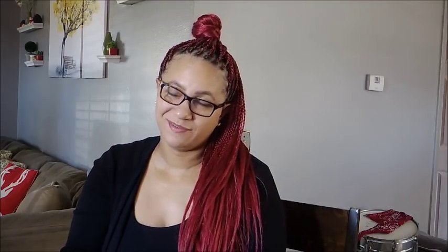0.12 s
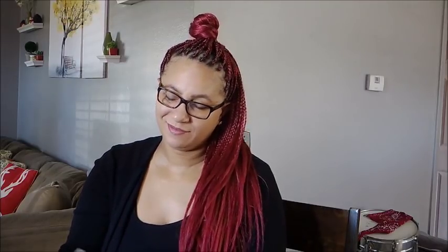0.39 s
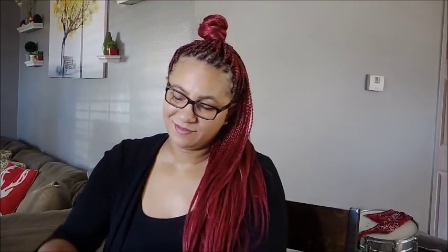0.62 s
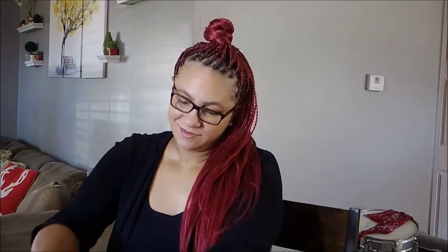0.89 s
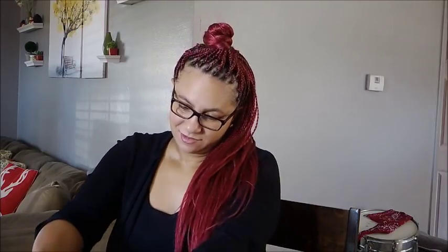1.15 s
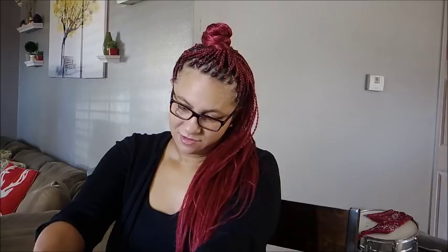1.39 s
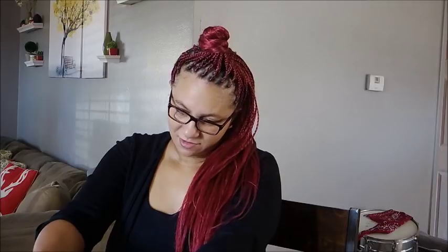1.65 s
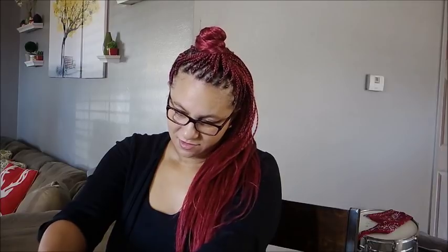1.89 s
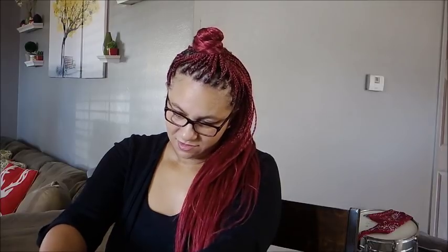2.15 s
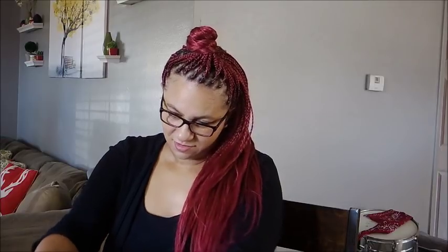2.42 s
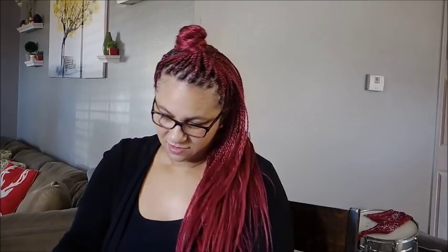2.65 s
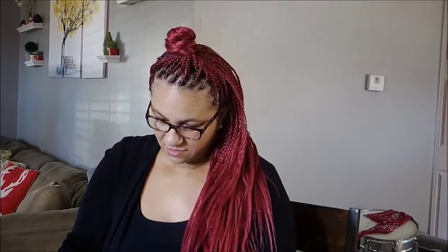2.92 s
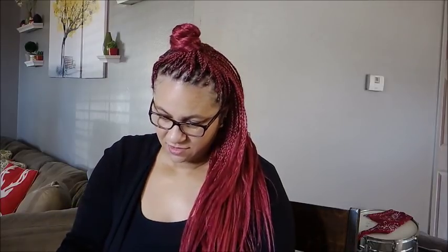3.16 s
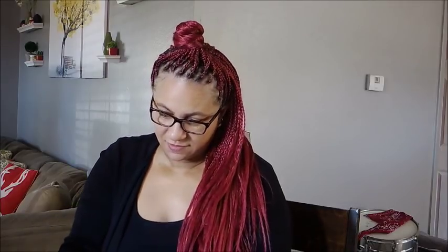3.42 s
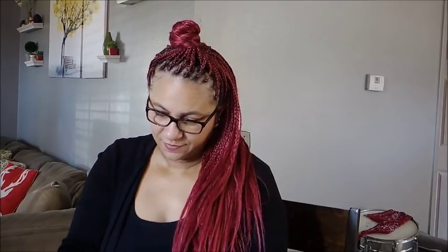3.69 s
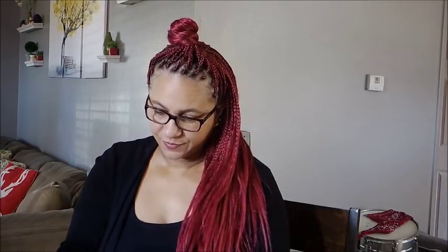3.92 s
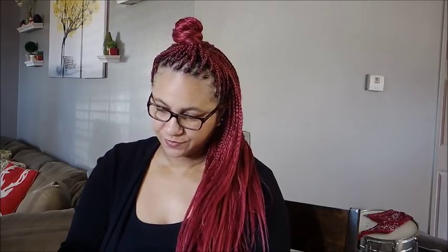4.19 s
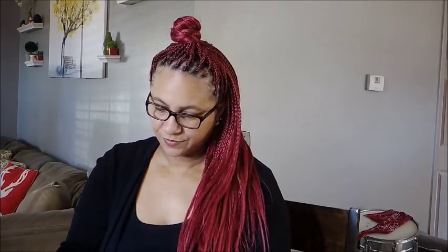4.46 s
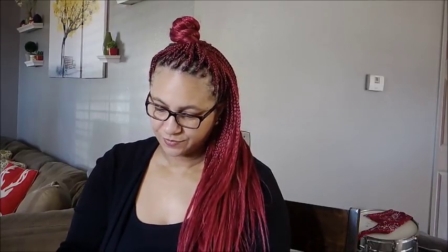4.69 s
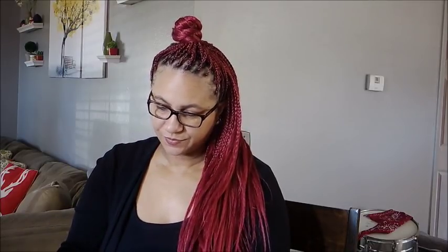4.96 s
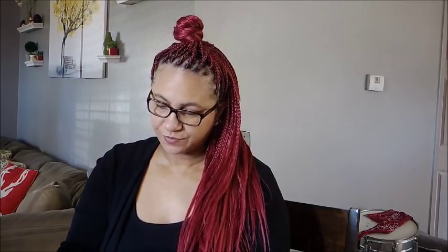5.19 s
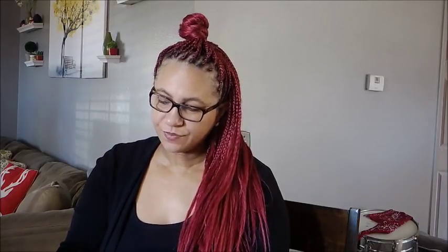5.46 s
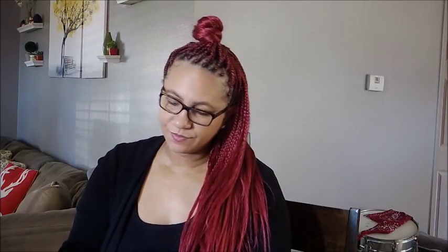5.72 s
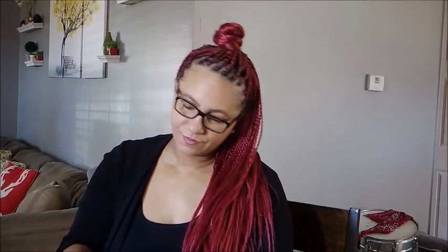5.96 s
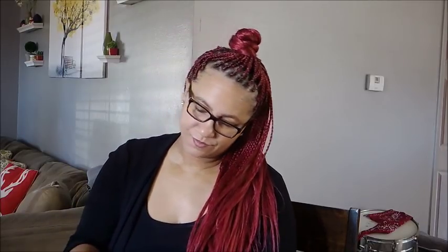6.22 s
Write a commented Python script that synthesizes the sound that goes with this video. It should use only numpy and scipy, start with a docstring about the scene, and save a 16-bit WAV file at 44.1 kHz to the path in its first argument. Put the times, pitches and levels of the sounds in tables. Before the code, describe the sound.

A close mono microphone hears cards handled on a wooden table: a slap and flat double knock, a quiet gap, then a papery riffle thickening into crisp ticks and a tight clap. Packets are shoved together with lumpy slaps and rubbing. Later come a quick edge tap, a much harder cracking blow and low closing knocks, with short room reverberation over soft hum and hiss.

```python
"""A deck of cards is handled on a wooden table in a living room, with a soft hum underneath throughout.
It starts with a snap, a slap and flat knocks: noise bursts, plus decaying tones for wood and room boom.
From about 1 s the cards riffle: edges click over a rub made of tiny catches; one noisy clap follows.
From about 2.7 s the cards are pushed together, with slaps of lumpy noise. Edge knocks come near 4.4 s.
The hardest blow, at 5.6 s, makes the deck ring; flat knocks end it. Fading noise makes the walls answer."""
import sys
import numpy as np
from scipy import signal
from scipy.fft import rfft, irfft
from scipy.io import wavfile
from scipy.ndimage import map_coordinates

SR = 44100
rng = np.random.default_rng(int(sys.argv[2]) if len(sys.argv) > 2 else 0)


def bounce(signal):
    """Save signal as a 16-bit WAV file at the path given by the first command-line argument."""
    frames = np.transpose(np.atleast_2d(signal))
    limited = np.clip(frames, -1, 1)
    pcm = np.round(limited * 32767).astype(np.int16)
    wavfile.write(sys.argv[1], SR, pcm)


def volts_from_db(level):
    """Convert decibel levels to linear amplitude ratios."""
    exponent = np.asarray(level, float) / 20
    return 10 ** exponent


N = 279726  # length in samples

# Levels called relative set a balance; the functions below scale them further.
# Colour of the room's rumble and the microphone hiss: pitch_hz, relative level_db per hertz
AIR_COLOUR = [(12, -46), (20, -1), (66, 0), (113, -5), (152, -6.5), (174, -6.5), (222, -9), (275, -8.5),
              (729, -19), (1120, -23), (1220, -25), (1780, -26.5), (6010, -38.5), (6880, -34),
              (11100, -52.5), (11600, -55), (12800, -65.5), (16700, -100), (22000, -120)]
# Card edges letting go: start_s, relative tick level_db, flap over the tick_db
EDGE_SNAPS = [(.0005, -28.5, 7.5), (.008, -43, 15), (0.1177, -51, 21.5), (1.0682, -43, -1),
              (1.0998, -27, -6), (1.1844, -30, -6), (1.1898, -17.5, -12.5), (1.196, -29, 0),
              (1.256, -41, -2), (1.289, -26.5, -7.5), (1.3075, -31, -10), (1.323, -30.5, -1),
              (1.3458, -12.5, -10.5), (1.3561, -23, 2), (1.4073, -20.5, 3), (1.451, -18, -9),
              (1.4815, -21, -1), (1.4952, -10, -6.5), (1.565, -17, -5.5), (1.5731, -16, 0),
              (1.612, -14, -2.5), (1.6225, -14, 1.5), (1.642, -4.5, -27), (1.6748, -24.5, 9),
              (1.6912, -13, -6), (1.6963, -20.5, -26), (1.704, -17.5, 3), (1.7191, -14.5, -5),
              (1.765, -14, -8.5), (1.795, -16.5, 0), (1.8065, -14, -6.5), (1.811, -19.5, -3.5),
              (1.816, -18.5, 0), (1.8273, -17, -1.5), (1.8875, -14, -4.5), (1.911, -16, -1),
              (1.9214, -27.5, 12.5), (1.9446, -14.5, -5), (1.9576, -16.5, 2), (2.008, -19, -15),
              (2.012, -24, -14), (2.016, -16, -10), (2.02, -31, 10), (2.0242, -24, 7.5), (2.03, -31, 9),
              (2.0599, -24, 7), (2.0774, -18.5, -14), (2.097, -31, 11.5), (2.108, -18, -36),
              (2.7013, -37, 2), (2.7267, -40, 7.5), (2.815, -47, 11), (2.845, -36, 13), (2.8785, -22.5, 3),
              (2.9567, -39.5, 8.5), (3.0058, -29.5, 3), (3.036, -34, 0), (3.303, -42, 8), (3.313, -47, 8),
              (3.323, -32, 12), (3.3262, -35.5, 11), (3.4395, -29.5, 4), (3.4424, -34, 13.5),
              (3.464, -34.5, 12), (3.504, -36, -1), (3.5155, -49, 13.5), (3.531, -28.5, -3),
              (3.571, -38, 14.5), (3.616, -42, 9), (3.635, -35, 9), (3.641, -37, 13), (3.6538, -27.5, 2),
              (3.684, -43, 3), (3.697, -42, 5), (3.71, -39, -1), (3.719, -32, 2), (3.827, -40, -7),
              (3.858, -40.5, 2.5), (3.92, -24.5, -40), (4.199, -41, -5), (4.2052, -26.5, -18),
              (4.3742, -31.5, -5), (5.605, -35, -37), (6.046, -41, 6), (6.0549, -23.5, -24),
              (6.0605, -39, -12), (6.069, -30, -14)]
# Colours of a snap's tick, flap and puff of air: pitch_hz, relative level_db per hertz
TICK_COLOUR = [(1500, -63.5), (2500, -24), (3500, -11), (5000, -10.5), (6000, -4.5), (6800, 1.9),
               (7600, -4), (9000, -13.5), (11000, -31.5), (13000, -53), (15000, -69)]
FLAP_COLOUR = [(200, -47.5), (500, -12), (1000, 0), (1600, 1.5), (2400, 4), (3500, -3.5), (5000, -13.5),
               (7000, -48.5), (12000, -91)]
PUFF_COLOUR = [(50, -29), (100, -22), (200, 0), (280, -0.5), (450, -3), (700, -4), (1200, -33.5),
               (5000, -88.5)]
# Packets of cards dropping onto the pile:
# start_s, relative slap level_db, swish over the slap_db, thud over the slap_db, time to fade by 60 dB_s
PACKET_SLAPS = [(.0005, -25, -21, -32, 0.14), (2.696, -29.5, -31, 0, 0.056), (2.778, -40.5, -20, 15, 0.036),
                (2.798, -25.5, -13, -7, .16), (2.811, -21, -16, -6, 0.091), (2.983, -26, -7, -8.5, 0.14),
                (3.0048, -19, 3, -6.5, 0.058), (3.019, -30.5, 4.5, -18, 0.11),
                (3.3003, -24, -25, -18, 0.22), (3.3243, -33, 0, -4, 0.064),
                (3.4364, -19.5, -16, -11, 0.067), (3.4546, -23.5, -21, -40, 0.08),
                (3.5131, -21.5, -31, -33, 0.079), (3.5689, -24.5, -17, -7, 0.072),
                (3.6349, -20, -5, -40, 0.16)]
# Colours of a packet's swish and thud: pitch_hz, relative level_db per hertz
SWISH_COLOUR = [(1000, -43), (2500, -21), (4300, 2), (5200, 8), (6000, 5), (7200, 0), (8500, -28),
                (11000, -53), (13000, -65)]
THUD_COLOUR = [(100, -26), (250, -21), (450, -22), (630, 1.5), (800, -6.5), (1100, -14.5), (1600, -6),
               (5000, -79)]
# Blows of the deck on the table, first flat, then on its edge: start_s, relative clack level_db,
# clack fade by 60 dB_s, relative table level_db, relative boom level_db, centre of the blow's colour_hz
FLAT_KNOCKS = [(.0005, -26.5, 0.024, -24, -26.5, 490), (0.1192, -36, 0.083, -27, -28, 448),
               (0.1248, -33.5, 0.058, -24, -52, 444), (6.0538, -32, 0.019, -25.5, -26, 833),
               (6.06, -26, 0.024, -24, -31.5, 385)]
EDGE_KNOCKS = [(4.3665, -27, 0.08, -24.5, -35, 1390), (4.369, -28, 0.15, -23, -46, 1460),
               (4.374, -28.5, 0.14, -33, -48, 2300), (5.603, -22.5, 0.018, -26, -44, 2010),
               (5.6041, -15.5, 0.074, -43, -24, 2170)]
# Tones of the table top: pitch_hz, relative level_db, time to fade by 60 dB_s
WOOD_TONES = [(391, 8, 0.015), (627.4, -1.5, 0.057), (800, -1.5, 0.044), (980, -4, 0.031),
              (1300, 16, 0.027), (1840, -5, 0.0063), (2300, 0, 0.02)]
# Tones of the room's low boom after a blow: pitch_hz, relative level_db, time to fade by 60 dB_s
BOOM_TONES = [(79, -11, 0.38), (149, 6, 0.13), (206, 0, 0.19), (271.3, -12, 0.55)]
# Paper against wood gives little treble: pitch_hz, relative level_db
PAPER_COLOUR = [(5000, 0), (6000, -7), (9000, -12), (11000, -28), (13000, -50)]
# First echoes off close surfaces: delay_s, typical level_db
NEAR_ECHOES = [(.0042, -41), (.0072, -14.5), (.017, -9), (0.03, -25.5)]
# How long the walls' answer lasts: pitch_hz, time to fade by 60 dB_s
WALL_FADES = [(150, 0.26), (700, 0.57), (2300, 0.55), (7000, 0.47), (12000, 0.18)]
# How strongly the walls answer: pitch_hz, relative level_db
WALL_COLOUR = [(150, 2.4), (750, -2), (1500, 3), (2400, -4), (3500, 0.1), (7000, 1.48)]
# Rubbing in the riffle and in the pushing together:
# time_s, pressure as relative scrape level_db, edge hiss over the scrape_db
RIFFLE_RUB = [(1.05, -85, -8), (1.12, -64, 8), (1.175, -59, -2), (1.21, -51, 1), (1.264, -57, 1),
              (1.33, -51, 5.5), (1.498, -49, 0), (1.6, -51, -3), (1.66, -41.5, 5.5), (1.758, -38, 0),
              (1.814, -40, -2), (1.87, -46, 4.5), (1.938, -40.5, 0), (2.006, -50, 5), (2.076, -44.5, 11),
              (2.2, -62.5, 10)]
PUSH_RUB = [(2.66, -63, -2), (2.71, -68, -9), (2.744, -47.5, -20), (2.85, -43.5, -19), (2.94, -56, -6),
            (2.998, -45.5, -27), (3.105, -53.5, 4), (3.15, -56.5, 2.5), (3.2, -61, -10), (3.25, -49.5, -20),
            (3.29, -57, -22), (3.31, -51, -15), (3.356, -51, 5), (3.42, -51, -12), (3.522, -53, -5),
            (3.56, -46.5, 5), (3.61, -57, -9), (3.7, -43.5, -20), (3.798, -60, -2), (3.9, -73, 9)]
# The bright hiss of the room's echo after the hardest blow:
# time_s, relative scrape-coloured level_db, hiss over that_db
ECHO_HISS = [(5.612, -80, 13), (5.63, -64, 18), (5.7, -73, 14.5), (5.798, -89, 18)]
# The deck claps shut once; the second row is its echo off a near surface: start_s, level_db
SHUT_CLAP = [(2.074, -9), (2.0812, -17)]
# Tones of the squared deck, stiff along its edge: pitch_hz, relative level_db
DECK_TONES = [(340, -13), (800, -1), (1230, -9), (1455, -1), (2280, 2), (2620, -5), (2870, -3), (3440, -9),
              (3900, -7), (4250, -9), (4850, -15)]


def unit(x):
    """Scales a sound to an rms (average strength) of 1."""
    return x / np.sqrt(np.mean(x ** 2) + 1e-20)


def along(points, hz):
    """Reads a curve of pitch and value between its points, on a log pitch axis."""
    point_hz, value = np.transpose(points)
    return np.interp(np.log(hz + 1), np.log(point_hz + 1), value)


def curves(rows):
    """One value per sample for each column after the time; -120 dB outside."""
    time_s, *columns = np.transpose(rows)
    now_s = np.arange(N) / SR
    return [np.interp(now_s, time_s, column, left=-120, right=-120) for column in columns]


def wobble(rate):
    """A smooth random curve with this many random points a second."""
    points = rng.standard_normal(int(N * rate / SR) + 4)
    return map_coordinates(points, [np.arange(N) * rate / SR])


def coloured(x, spectrum):
    """Filters a sound to this colour, with a filter of energy 1 that acts only after each input."""
    size = 4096
    level_db = along(spectrum, np.fft.rfftfreq(size, 1 / SR))
    # folding the cepstrum (spectrum of the log spectrum) puts the filter's energy early
    cepstrum = irfft(np.log(volts_from_db(level_db) + 1e-6), size)
    cepstrum[1:size // 2] *= 2
    cepstrum[size // 2 + 1:] = 0
    pulse = irfft(np.exp(rfft(cepstrum)), size)
    return signal.fftconvolve(x, pulse / np.linalg.norm(pulse))[:len(x)]


def add(track, start_s, sound):
    """Mixes a sound into the track at its start time."""
    part = track[max(round(start_s * SR), 0):][:len(sound)]
    part += sound[:len(part)]


def air():
    """Room rumble and microphone hiss are coloured noise; a wavering low tone hums and swells once."""
    hiss_db = -50 + 1.2 * wobble(1.9)
    hiss = volts_from_db(hiss_db) * unit(coloured(rng.standard_normal(N), AIR_COLOUR))
    hum_hz = 142 + 1.56 * wobble(12)
    phase = 2 * np.pi * np.cumsum(hum_hz) / SR
    swell_middle_s, swell_half_width_s = 3.45, 0.47
    swell = volts_from_db(-51) * np.exp(-((np.arange(N) / SR - swell_middle_s) / swell_half_width_s) ** 2)
    hum = (swell + volts_from_db(-59.5)) * volts_from_db(1.2 * wobble(15)) * np.sin(phase)
    return hiss + hum


def crackle(t, t60, rise, colour, click=0, lumpy_db=0):
    """A fading burst of coloured noise of peak 1; it can start with a click and jump in level every 2 ms."""
    lumps_db = lumpy_db * np.repeat(rng.standard_normal(len(t) // 88 + 1), 88)[:len(t)]
    fade = volts_from_db(-60 * t / t60)
    burst = volts_from_db(lumps_db) * rng.standard_normal(len(t)) * fade * (1 - np.exp(-t / rise))
    burst[1] += click
    burst = coloured(burst, colour)
    return burst / np.abs(burst).max()


def snaps():
    """Each card edge lets go with a tick, the flap of the card and a puff of air, all short noise bursts."""
    track, t = np.zeros(N), np.arange(SR // 10) / SR
    pressure_db = np.maximum(curves(RIFFLE_RUB)[0], curves(PUSH_RUB)[0])
    for start_s, tick_db, flap_db in EDGE_SNAPS:
        tick = crackle(t, 0.021, 0.0001, TICK_COLOUR, click=6.73)
        flap = volts_from_db(flap_db) * crackle(t, 0.027, 0.00035, FLAP_COLOUR, click=5.8)
        # harder rubbing gives a stronger puff
        puff_db = min(flap_db, 0) / 2 + 21.5 + 0.74 * pressure_db[round(start_s * SR)]
        puff = volts_from_db(puff_db) * crackle(t, 0.044, 0.00059, PUFF_COLOUR, click=6.6)
        add(track, start_s, volts_from_db(tick_db - 2.5) * (tick + flap + puff))
    return track


def slaps():
    """A packet of cards lands with a lumpy noise slap, a swish and a thud, softer at the start than a snap."""
    track, t = np.zeros(N), np.arange(SR // 3) / SR
    for start_s, slap_db, swish_db, thud_db, t60 in PACKET_SLAPS:
        slap = crackle(t, t60, 0.0016, FLAP_COLOUR, lumpy_db=3.0)
        swish = volts_from_db(swish_db) * crackle(t, t60, 0.00051, SWISH_COLOUR, lumpy_db=5.5)
        thud = volts_from_db(thud_db) * crackle(t, t60, 0.0061, THUD_COLOUR)
        add(track, start_s, volts_from_db(slap_db - 6.5) * (slap + swish + thud))
    return track


def ring(tones, t, centre_hz, octaves, envelope):
    """Fading tones at slightly random strengths; those nearest the centre pitch ring most."""
    hz, db, t60 = np.transpose(tones)[:, :, None]
    distance_octaves = np.log2(hz / centre_hz)
    share = np.exp(-0.5 * (distance_octaves / np.clip(octaves, 0.1, 4)) ** 2)
    level_chance, phase_chance = rng.standard_normal((2, len(tones), 1))
    strength = volts_from_db(db + 1.2 * level_chance - 60 * t / t60)
    waves = strength * np.sin(2 * np.pi * (hz * t + 0.15 * phase_chance))
    return envelope * np.sum(share * waves, 0) / np.linalg.norm(share)


def clack(t, db, centre_hz, octaves, t60):
    """A noisy blow whose colour is a bell shape around its centre pitch."""
    bell = [(centre_hz * 2 ** (k * octaves), -4.3 * k * k) for k in range(-5, 6)]
    return volts_from_db(db) * crackle(t, t60, 0.00013, bell, click=3.9)


def knocks():
    """The deck hits the table: a noisy clack, ringing wood, and the room's low boom, which builds up late."""
    # colour width in octaves, centre of the table's ring over that of the blow, boom centre in Hz
    flat, edge = (1.42, 1, 228), (0.62, 0.45, 143)
    track, t = np.zeros(N), np.arange(SR // 2) / SR
    sharp = 1 - np.exp(-t / 0.0014)
    swelling = np.exp(-((t - 0.04) / 0.011) ** 2) + 0.3 * (1 - np.exp(-t / 0.013))
    blows = [(*row, *flat) for row in FLAT_KNOCKS] + [(*row, *edge) for row in EDGE_KNOCKS]
    for start_s, clack_db, t60, table_db, boom_db, centre_hz, octaves, ring_ratio, boom_hz in blows:
        wood = volts_from_db(table_db) * ring(WOOD_TONES, t, ring_ratio * centre_hz, 0.49, sharp)
        boom = volts_from_db(boom_db + 6.5) * ring(BOOM_TONES, t, boom_hz, 0.53, swelling)
        add(track, start_s, wood + boom + clack(t, clack_db, centre_hz, octaves, t60))
    return coloured(track, PAPER_COLOUR)


def walls(x):
    """Walls answer with a noise tail, fresh every 1/8 s, in which each pitch dies at its own speed."""
    out, step = np.zeros(N), SR // 8
    for start in range(0, N, step):
        hz, t, noise = signal.stft(rng.standard_normal(SR // 2), SR, nperseg=256)
        fade = volts_from_db(-60 * t / along(WALL_FADES, hz)[:, None])
        tail = signal.istft(noise * fade, SR, nperseg=256)[1]
        tail *= 1 - np.exp(-np.arange(len(tail)) / SR / 0.006)  # the tail builds up softly
        tail /= np.linalg.norm(tail)
        for delay_s, db in NEAR_ECHOES:
            tail[round(delay_s * SR)] += volts_from_db(db + rng.normal())
        add(out, start / SR, signal.fftconvolve(x[start:start + step], tail))
    return coloured(out, WALL_COLOUR)


def rubbing_and_echo_hiss():
    """Rubbing is a dense, clumpy stream of catches in three colours; the late echo hiss reuses the stream."""
    catch_db = 3 * np.minimum(rng.exponential(size=N), 2)
    happens = rng.random(N) < 1500 / SR  # about 1500 catches a second
    catches = happens * rng.standard_normal(N) * volts_from_db(catch_db)
    clumps = volts_from_db(2.2 * wobble(120) + 1.2 * wobble(18))
    rub = clumps * (unit(catches) + 0.8 * rng.standard_normal(N))
    scrape, hiss, drag = [unit(coloured(rub, c)) for c in (FLAP_COLOUR, TICK_COLOUR, PUFF_COLOUR)]
    track = np.zeros(N)
    for rows in (RIFFLE_RUB, PUSH_RUB, ECHO_HISS):
        scrape_db, hiss_db = curves(rows)
        track += volts_from_db(scrape_db) * (scrape + volts_from_db(hiss_db) * hiss + volts_from_db(-2) * drag)
    return track


def shut_clap():
    """The deck claps shut in a very short noise burst, and a near surface echoes it with a weaker burst."""
    track, t = np.zeros(N), np.arange(SR // 10) / SR
    for start_s, db in SHUT_CLAP:
        add(track, start_s, clack(t, db, centre_hz=2320, octaves=0.17, t60=0.002))
    return track


def deck():
    """The deck rings only under the hardest blow; paper damps its high tones fastest, then the hand all."""
    track, t = np.zeros(N), np.arange(SR // 10) / SR
    # each tone fades by 60 dB in 18 ms plus the time of 60 of its cycles
    tones = [(hz, db, 0.018 + 60 / hz) for hz, db in DECK_TONES]
    rise_s, held_s = 0.0015, 0.013
    envelope = (1 - np.exp(-(t / rise_s) ** 2)) * np.exp(-(t / held_s) ** 4)
    add(track, 5.6032, volts_from_db(-5) * ring(tones, t, 2000, 4, envelope))
    return coloured(track, PAPER_COLOUR)


def scene():
    """Adds up everything on the table, its echo and the room."""
    edges, packets, blows = snaps(), slaps(), knocks()
    rubbing, clap, ringing = rubbing_and_echo_hiss(), shut_clap(), deck()
    # each source reaches the walls at its own strength
    to_walls = volts_from_db(-6.5) * edges + volts_from_db(-0.5) * packets + volts_from_db(-4.5) * blows
    to_walls += volts_from_db(-10.0) * rubbing + volts_from_db(-6.0) * clap + volts_from_db(-6.5) * ringing
    direct = edges + packets + blows + rubbing + clap + ringing
    return (direct + walls(to_walls) + air())[None]  # one channel


def roll_off(x):
    """The treble ends steeply here."""
    return signal.sosfilt(signal.butter(12, 12960, fs=SR, output="sos"), x)


def record(dry):
    """Turns the finished mix into the final sound."""
    return roll_off(dry)


dry = scene()
out = record(dry)
bounce(out)
```